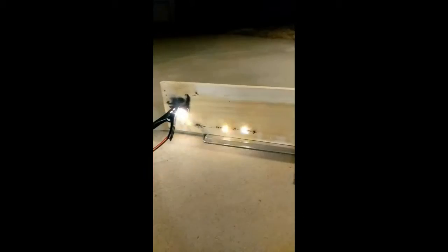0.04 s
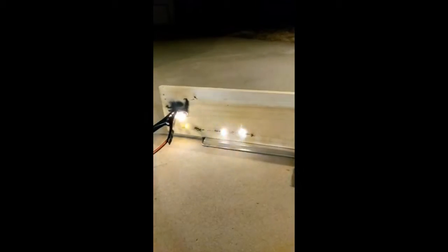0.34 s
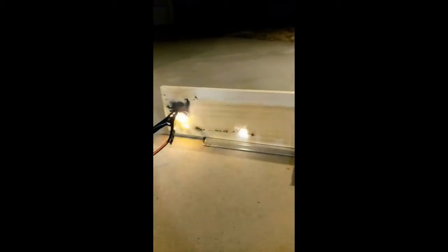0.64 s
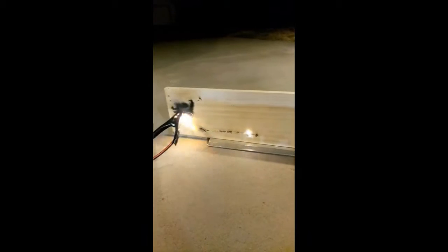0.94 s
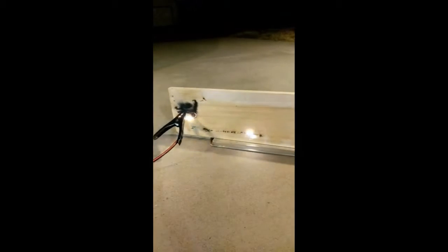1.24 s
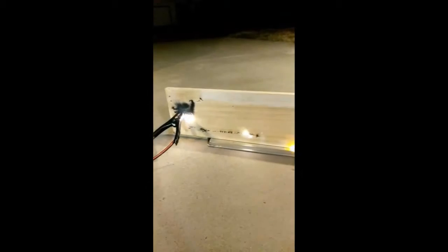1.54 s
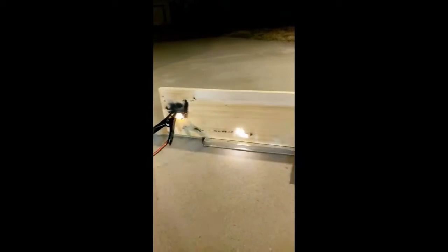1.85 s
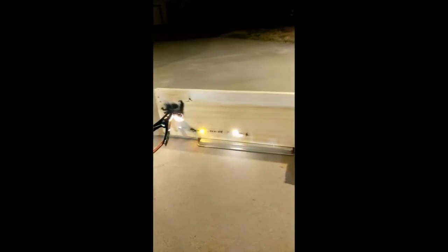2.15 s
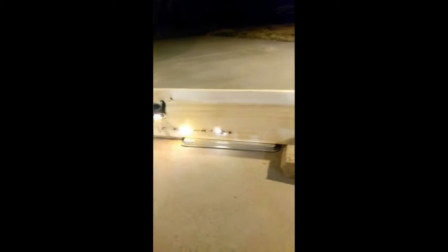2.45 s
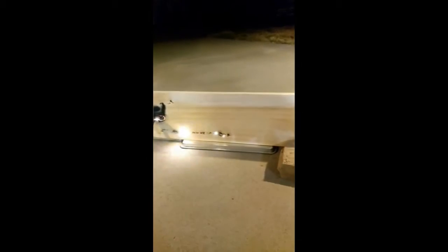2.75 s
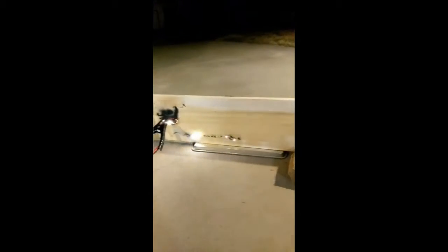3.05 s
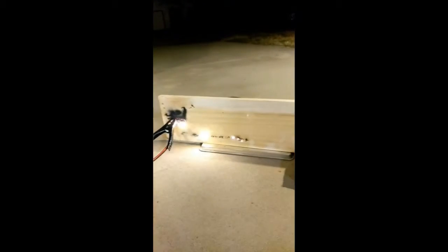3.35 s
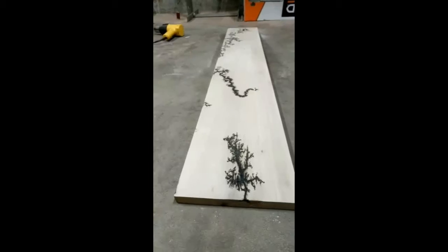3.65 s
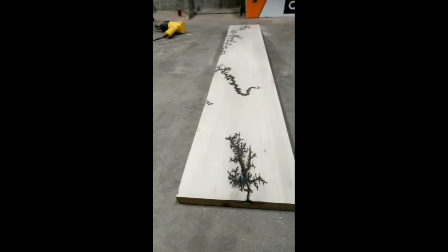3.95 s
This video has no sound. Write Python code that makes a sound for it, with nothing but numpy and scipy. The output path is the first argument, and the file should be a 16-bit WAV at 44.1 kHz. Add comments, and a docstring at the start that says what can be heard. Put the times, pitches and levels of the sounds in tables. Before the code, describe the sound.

An electric arc buzzes and crackles close by as it burns across a wooden board in a workshop. Sharp snaps and brief sizzles ride over a low hum and flame flutter, then everything stops abruptly, leaving faint room air.

```python
"""On the concrete floor of a workshop, a high-voltage arc burns its way across a wooden board. It lights once
per mains cycle, so it buzzes: each burn is a 5 ms spray of tiny sparks with a puff of heated air, now and then
with a sharp snap. A few times the crackle turns for an instant into a brief pitched sizzle. The supply hums and
the flame flutters and thumps. All stops abruptly; after a silence, quiet room air is left."""
import sys
import numpy as np
from scipy import signal
from scipy.fft import rfft, irfft
from scipy.io import wavfile
from scipy.ndimage import uniform_filter1d

SR = 44100
rng = np.random.default_rng(int(sys.argv[2]) if len(sys.argv) > 2 else 0)


def bounce(signal):
    """Save signal as a 16-bit WAV file at the path given by the first command-line argument."""
    frames = np.transpose(np.atleast_2d(signal))
    limited = np.clip(frames, -1, 1)
    pcm = np.round(limited * 32767).astype(np.int16)
    wavfile.write(sys.argv[1], SR, pcm)


N = 176400
MAINS_HZ = 59.969
START_S, FIRST_BURN_S, STOP_S = .099, .103, 3.51

# Loud snaps, each with a flare of its burn: t/s, relative peak level/dB, flare/dB
SNAPS = [(0.219, -19, 3.9), (0.436, -22, 1.8), (0.4687, -21, 1.8), (0.6878, -20, 0), (0.7021, -19, 0.7),
         (0.754, -18, 3.1), (0.8353, -19, 2.2), (0.9693, -20, 1), (1.0198, -18, 4.4), (1.088, -20, 1.4),
         (1.1044, -20, 2.6), (1.1691, -15, 3.2), (1.2195, -19, 2.4), (1.4198, -14, 2.0), (1.4537, -16, 2.1),
         (1.4867, -14, 2.8), (1.5208, -18, 1.5), (1.5545, -15, 0.1), (1.5863, -16, 0.8), (1.6183, -17, 1.5),
         (1.669, -12, 2.6), (1.7217, -16, 1.9), (1.7388, -15, 1.8), (1.7697, -24, 2.3), (1.8036, -22, 7.9),
         (1.8534, -26, 3.5), (1.9545, -18, 0.7), (2.0891, -19, 1.2), (2.1212, -17, 0.9), (2.1885, -16, 1.2),
         (2.2205, -16, 1.2), (2.2374, -15, 2.2), (2.2549, -16, 0.1), (2.2722, -17, 1.8), (2.3062, -21, 3.7),
         (2.3882, -17, 1.9), (2.5041, -19, 1.8), (2.5378, -21, 1.2), (2.5708, -18, 0.1),
         (2.5879, -19, -1.5), (2.6553, -18, 3.2), (2.6717, -20, 1.1), (2.7695, -20, 1.1),
         (2.8039, -20, 3.3), (2.9033, -20, 3.3), (3.0216, -21, 2.7), (3.0556, -19, 3.6), (3.1189, -19, 3.1),
         (3.1388, -18, 3.1), (3.1872, -16, 3.8), (3.3038, -15, 5.4), (3.3535, -18, 0.7), (3.3877, -18, 2.2),
         (3.421, -17, 2.9), (3.4705, -19, 1), (3.5024, -18, 1.6)]


def from_db(db):
    """Amplitude ratio of a level: tenfold for every 20 dB."""
    return 10 ** (np.asarray(db) / 20)


def rms_one(x):
    """Normalisation to unit mean power."""
    return x / np.sqrt(np.mean(x ** 2) + 1e-20)


def curve(rows, t):
    """Linear interpolation of each column of a table at times t."""
    times, *columns = np.transpose(rows)
    return [np.interp(t, times, column) for column in columns]


def filtered(x, hz, kind, order=1):
    """Causal Butterworth filter: maximally flat in its passband."""
    sections = signal.butter(order, hz, kind, fs=SR, output="sos")
    return signal.sosfilt(sections, x + 1e-18)


def coloured(x, spectrum):
    """Minimum-phase filter: folding the cepstrum makes the given spectrum's response causal."""
    hz, db = np.transpose(spectrum)
    bin_hz = np.maximum(np.arange(N // 2 + 1) * SR / N, 1)
    gain = from_db(np.interp(np.log(bin_hz), np.log(hz), db))
    cepstrum = irfft(np.log(gain), N)
    cepstrum[1:N // 2] *= 2
    cepstrum[N // 2 + 1:] = 0
    return irfft(rfft(x) * np.exp(rfft(cepstrum)), N)


def clicks(times, sizes):
    """Ideal impulses: one sample long, each with a flat spectrum."""
    return np.bincount((times * SR).astype(int), sizes, N)[:N]


def hum(t, lag_s=.00387, waver_db=3, waver_hz=12):
    """Harmonic series of the supply, cresting as each burn goes out; each partial wavers on its own."""
    # Partials: multiple of the mains frequency, relative level/dB
    harmonics = [(1, -65), (2, -55.5), (4, -62), (6, -61.5)]
    # Swell of the hum: t/s, gain/dB
    swell = [(.1, -9), (.34, 1.5), (.42, -2.5), (1.7, 4), (1.85, 0), (2.15, 2), (3.5, -1.5)]
    swell_db, = curve(swell, t)
    phase = 2 * np.pi * MAINS_HZ * (t - FIRST_BURN_S - lag_s)
    out = np.zeros(N)
    for multiple, db in harmonics:
        waver = rms_one(filtered(rng.standard_normal(N), waver_hz, "low", order=2))
        out += np.sqrt(2) * from_db(db + swell_db + waver_db * waver) * np.cos(multiple * phase)
    return out


def flame(t):
    """Combustion noise: the burning wood flutters, mostly at low frequencies."""
    # Strength of the flutter: t/s, level/dB
    strength = [(.1, -53.5), (.36, -50.5), (.40, -47), (1.15, -48), (1.6, -46.5), (2.2, -48), (2.35, -43),
                (2.8, -46.5), (3.05, -42.5), (3.25, -44), (3.5, -42.5)]
    # Spectrum of the flutter: f/Hz, relative spectral level/dB
    spectrum = [(20, -55.5), (32, -21), (48, 6.5), (75, 7), (110, -3), (180, -1.5), (300, -8), (700, -12.5),
                (2000, -32)]
    db, = curve(strength, t)
    return from_db(db) * rms_one(coloured(rng.standard_normal(N), spectrum))


def burns(mean_s=.00494, growth_s_per_db=.00005, jitter_s=.0003, falter_share=.45):
    """Periodic ignition, longer when the arc is strong. Gives centres/s, lengths/s, levels/dB."""
    # Strength of the arc, which nearly dies twice: t/s, level/dB
    strength = [(0.1, -47.0), (0.17, -41.7), (0.45, -39.5), (1.05, -37.3), (1.38, -37.8), (1.5, -34.6),
                (1.74, -37), (1.785, -46.7), (1.885, -45.5), (1.905, -41), (1.92, -36.2), (2.04, -37.6),
                (2.09, -33.7), (2.265, -34.4), (2.29, -42.5), (2.325, -48.4), (2.365, -43.7), (2.39, -33.5),
                (2.45, -39.8), (2.53, -35.5), (2.78, -38.3), (2.85, -41.3), (2.96, -41.6), (3.1, -37.0),
                (3.36, -35), (3.45, -34.8), (3.5, -33.3)]
    # Unevenness from burn to burn: t/s, standard deviation/dB
    unevenness = [(.1, 1.0), (1.6, .9), (3.4, 1.2)]
    centres = np.arange(FIRST_BURN_S, STOP_S, 1 / MAINS_HZ)
    level_draw, length_draw, time_draw = np.sqrt(3) * rng.uniform(-1, 1, (len(centres), 3)).T
    arc_db, = curve(strength, centres)
    spread_db, = curve(unevenness, centres)
    flaring = [np.argmin(abs(centres - onset)) for onset, _, _ in SNAPS]
    flare_db = np.bincount(flaring, np.array(SNAPS)[:, 2], len(centres))
    # The burns on either side of a flare falter.
    swing_db = spread_db * level_draw - falter_share * np.convolve(flare_db, [1, 0, 1], "same")
    swing_db[flaring] = flare_db[flaring]
    db = arc_db + swing_db
    lengths = mean_s + growth_s_per_db * (db - db.mean()) + jitter_s * length_draw
    return centres + jitter_s * time_draw, np.maximum(lengths, mean_s / 2), db


def burn_envelope(t, centres, lengths, strike_s=.0002, quench_s=.00048):
    """Fast ignition, slower quenching. Gives per sample the nearest burn, its progress and its gate."""
    nearest = np.round((t - FIRST_BURN_S) * MAINS_HZ).astype(int)
    nearest = np.clip(nearest, 0, len(centres) - 1)
    length = lengths[nearest]
    age = t - centres[nearest] + length / 2
    strike = (1 + np.tanh(age / (2 * strike_s))) / 2
    quench = (1 + np.tanh((length - age) / (2 * quench_s))) / 2
    return nearest, np.clip(age / length, 0, 1), strike * quench


def sparks(t, nearest, progress, lit, burn_db):
    """Shot noise: tiny random discharges crowd into each burn; their tone shifts as the arc wanders."""
    # Spectrum of a spark: f/Hz, relative spectral level/dB
    spectrum = [(180, -38), (300, 1), (326, -8.5), (366, 0.5), (398, -1.5), (622, -1), (867, -2), (1360, 1),
                (1600, 1), (2050, 1), (2310, -2), (2680, -2.5), (3920, -7), (4710, -3), (6780, -2),
                (8700, -12), (12500, -7), (15000, -11.5), (15800, -22.5)]
    # Six bands of the spark sound: lower f/Hz, upper f/Hz
    bands = [(560, 1050), (1200, 2000), (2200, 3300), (3600, 4800), (5300, 7500), (9000, 15500)]
    # Drift of the tone: t/s, then gain/dB for each band
    tone = [(0.1, 0, -1.5, -4.5, 4.5, 2.5, 2), (0.45, -3, -1, -4, 2, 2, 2.5),
            (0.95, 0, -0.5, -7.5, 7.5, -1, 0), (1.25, 2.5, 0.5, -3, 3.5, -4.5, 3),
            (1.42, -3.5, 0, 4.5, 3, -14, 2), (1.62, 1.5, -4.5, 3, 2, -17, 1.5),
            (1.85, -1.5, -1, -1.5, 6.5, -2, 3), (2.0, 2.5, -3, 2, 1, 1.5, 2.5),
            (2.2, -3, 1.5, 2.5, -2, 2, -6.5), (2.4, 5, -0.5, 2, -4, 2.3, -3.5),
            (2.6, 4.5, 1, 1.5, -2.5, -2.5, -7), (2.78, 1, 2.5, 1, -5, 2, -3),
            (3.0, 1.5, -1, 2, -3, 0.5, -2), (3.25, 4, 0.5, 1, -2, 5, -3), (3.5, 5, 1.5, -1.5, 2, -2.5, -8)]
    # Faint frying that goes on between burns: t/s, level/dB re the burn
    smoulder = [(.1, -25), (1.42, -25), (1.55, -17), (1.7, -24), (2.3, -30), (3.5, -26)]
    sparks_per_s, size_spread_db, gain_db = 22000, 3, -1.5
    sputter_db, sputter_hz, sag_db, tone_scatter_db = 1.6, 900, 3.5, 1.6
    sizes = from_db(size_spread_db * np.minimum(rng.exponential(1, N), 4)) * rng.choice([-1, 1], N)
    clumps = rms_one(filtered(rng.standard_normal(N), sputter_hz, "low", order=2))
    smoulder_db, = curve(smoulder, t)
    envelope = (lit + from_db(smoulder_db)) * from_db(sputter_db * np.clip(clumps, -2, 1) - sag_db * progress)
    fires = rng.random(N) < sparks_per_s / SR
    spray = coloured(sizes * fires * envelope, spectrum)
    spray = rms_one(filtered(spray, hz=230, kind="high", order=2)) * from_db(burn_db[nearest] + gain_db)
    scatter_db = tone_scatter_db * rng.standard_normal((len(burn_db), len(bands)))
    for edges, band_db, own_db in zip(bands, curve(tone, t), scatter_db.T):
        spray += (from_db(band_db + own_db[nearest]) - 1) * filtered(spray, edges, "band")
    return spray


def puffs(progress, lit, db, gain_db=-17, band_hz=(72, 620)):
    """Thermal expansion: air heats through each burn, then collapses; the change of heat is heard."""
    heat = progress * lit
    return from_db(db + gain_db) * rms_one(filtered(-np.gradient(heat), band_hz, "band"))


def snaps(centres, lengths, burn_db, tick_db=9.5, tick_spread_db=2, loud_gain_db=-1.5):
    """Impulsive discharges: a small pressure spike somewhere in every burn, and occasional loud ones."""
    tick_times = centres + lengths * rng.uniform(-.5, .5, len(centres))
    scatter_db = tick_spread_db * rng.uniform(-1, 1, len(centres))
    ticks = clicks(tick_times, from_db(burn_db + tick_db + scatter_db))
    onsets, peak_db, _ = np.transpose(SNAPS)
    loud = clicks(onsets, from_db(peak_db + loud_gain_db))
    spike = filtered(signal.unit_impulse(SR // 100), hz=5100, kind="low", order=2)
    spike = filtered(spike, hz=456, kind="high")
    return -np.convolve(ticks + loud, spike / spike.max())[:N]


def room(x, gain_db=-16.5, t60_s=.2, top_hz=7800, delay_s=.0023):
    """Reverberation: diffuse, slightly dull reflections decay exponentially and fill the gaps."""
    age = np.arange(SR // 2) / SR
    reflections = filtered(rng.standard_normal(len(age)), top_hz, "low")
    tail = reflections * from_db(-60 * age / t60_s) * (age > delay_s)
    return from_db(gain_db) * signal.fftconvolve(x, tail / np.linalg.norm(tail))[:N]


def thumps(t, rise_s=.0038):
    """Heavily damped oscillation: soft thumps of the flame swell and die within about two cycles."""
    # Low pressure pulses: t/s, envelope level/dB, f/Hz
    pulses = [(1.716, -24, 78), (2.381, -21, 69.6), (2.409, -33, 75), (2.692, -20, 73), (2.873, -27.5, 98),
              (3.213, -24, 51.3), (3.468, -24.5, 69)]
    out = np.zeros(N)
    for onset, db, hz in pulses:
        age = np.maximum(t - onset, 0)
        envelope = age / rise_s * np.exp(1 - age / rise_s)
        out -= from_db(db) * envelope * np.cos(2 * np.pi * hz * age)
    return out


def sizzles(t, bandwidth_hz=15, detune_share=.08, scatter_db=2.5, fade_s=.006):
    """Resonance: noise rings in narrow modes, retuned for each sizzle. Gives the sound and its gate."""
    # Pitched moments in the crackle: centre t/s, length/s, rms level/dB, tilt/(dB per octave)
    bursts = [(2.022, .024, -36.5, -1), (2.167, .029, -35, -1), (2.321, .026, -48.5, 1),
              (2.871, .024, -41, 0), (3.215, .024, -36, 0), (3.364, .025, -35.5, 0)]
    # Resonances of a sizzle: f/Hz, relative level/dB
    modes = [(560, -13), (880, -10), (1365, 3), (1830, 1), (2150, -7.5), (2620, 1), (3400, -5), (4530, 3),
             (5210, 1.5), (5750, -3.5), (6480, 5), (7000, 0.5)]
    out, gate = np.zeros(N), np.zeros(N)
    for centre, length, db, tilt_db in bursts:
        window = np.clip((length / 2 - abs(t - centre)) / fade_s + .5, 0, 1)
        on = window > 0
        count = on.sum()
        ring = np.zeros(count)
        for hz, mode_db in modes:
            detune, weight = rng.uniform(-.74, 1, 2)
            tuned_hz = hz * (1 + detune_share * detune)
            pole = np.exp((2j * tuned_hz - bandwidth_hz) * np.pi / SR)
            response = signal.lfilter([1], [1, -pole], rng.standard_normal(2 * count))
            tone = rms_one(response.real[count:])  # the first half lets the resonance build up
            ring += tone * from_db(mode_db + scatter_db * weight + tilt_db * np.log2(hz))
        out[on] += from_db(db) * rms_one(ring) * window[on]
        gate = np.maximum(gate, window)
    return out, gate


def room_air(t, onset_s=3.735, base_db=-64.5):
    """Ambient noise: quiet broadband room air, strongest in the bass, swells in and holds."""
    # Spectrum of the air: f/Hz, relative spectral level/dB
    spectrum = [(18, -33), (30, -9), (61, 4.5), (222, 0.5), (355, -5.5), (415, 0.5), (1170, -11.5),
                (1340, -9.5), (9150, -22), (15000, -32)]
    # Swell of the air: t/s, gain/dB
    swell = [(3.735, -6.5), (3.85, 1.5), (4, 1.5)]
    swell_db, = curve(swell, t)
    noise = rms_one(coloured(rng.standard_normal(N), spectrum))
    return from_db(base_db + swell_db) * noise * (t > onset_s)


def scene():
    """Superposition: arc, supply and flame sound together up to the stop; then silence and room air."""
    t = np.arange(N) / SR
    centres, lengths, burn_db = burns()
    nearest, progress, lit = burn_envelope(t, centres, lengths)
    sizzle, sizzling = sizzles(t)
    crackle = sparks(t, nearest, progress, lit, burn_db) + snaps(centres, lengths, burn_db)
    buzz = crackle + room(crackle) + puffs(progress, lit, burn_db[nearest])
    buzz *= 1 - .75 * sizzling  # the buzz mostly gives way to a sizzle
    rumble = filtered(flame(t) + thumps(t), hz=36.8, kind="high", order=4)
    arc = buzz + sizzle + room(sizzle) + hum(t) + rumble
    running = uniform_filter1d(1. * ((t > START_S) & (t < STOP_S)), size=90)  # 2 ms ramps
    return (arc * running + room_air(t))[None]


def record(dry, cutoff_hz=16100):
    """Band limiting: an elliptic low-pass filter cuts the top steeply."""
    return signal.sosfilt(signal.ellip(10, .2, 70, cutoff_hz, fs=SR, output="sos"), dry)


dry = scene()
out = record(dry)
bounce(out)
```